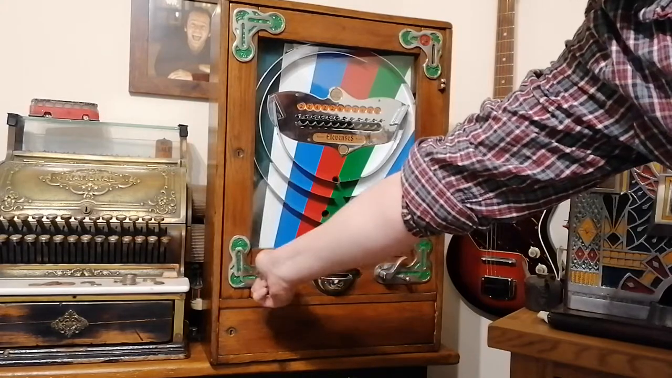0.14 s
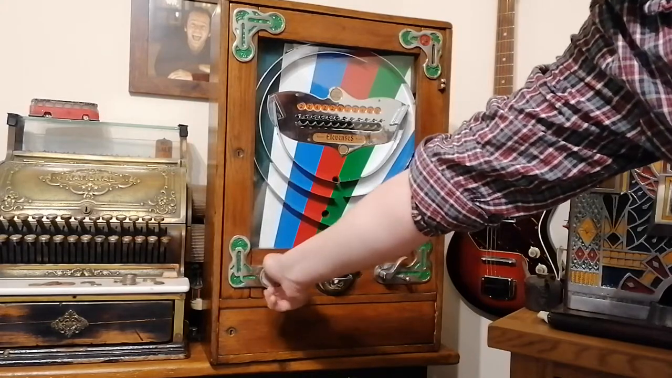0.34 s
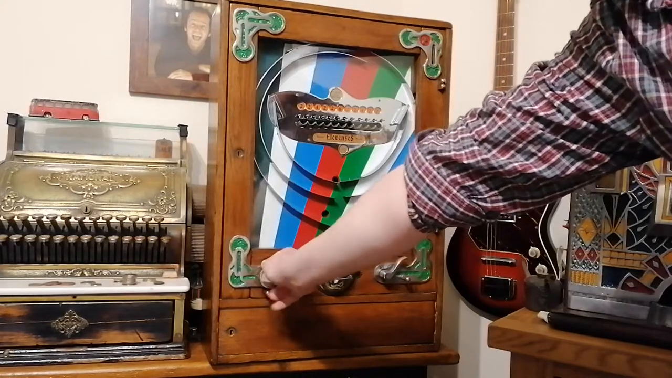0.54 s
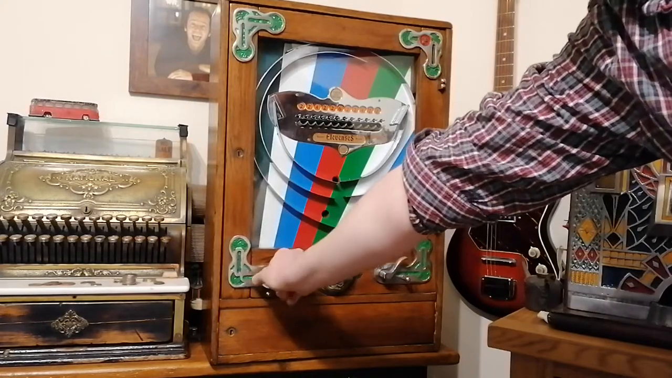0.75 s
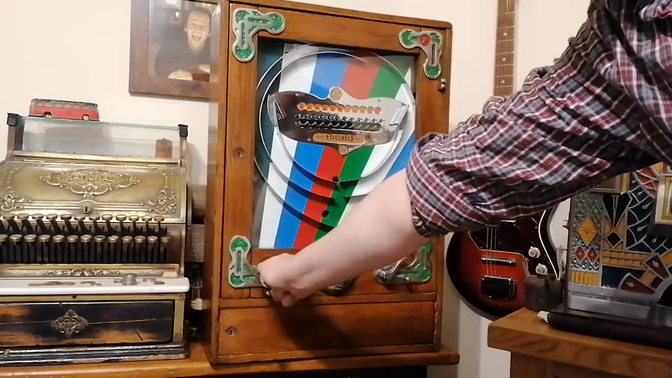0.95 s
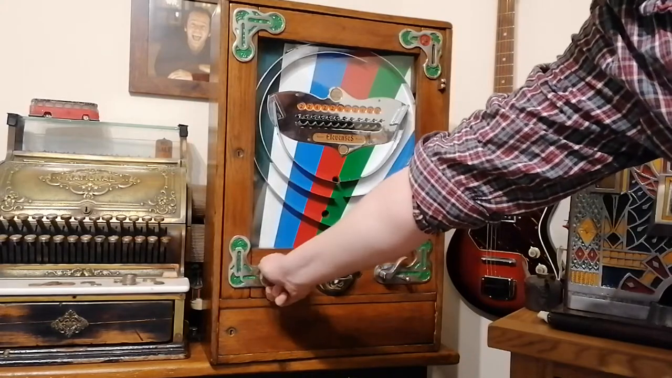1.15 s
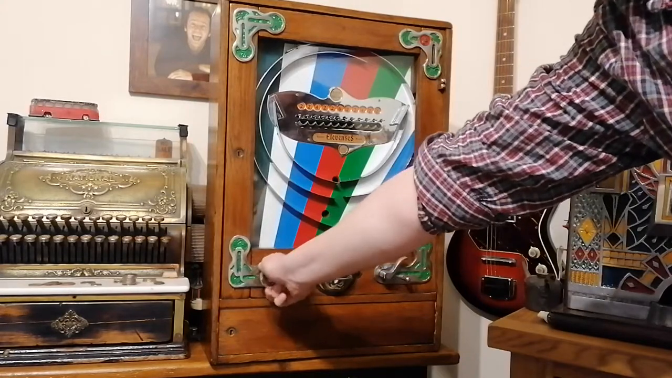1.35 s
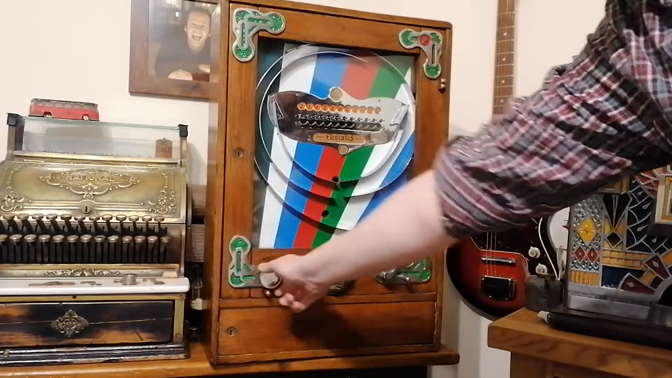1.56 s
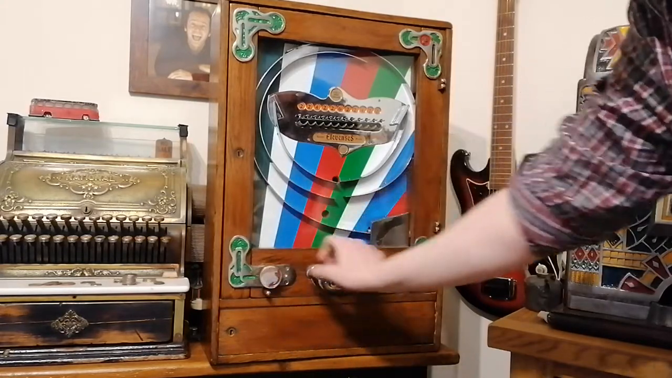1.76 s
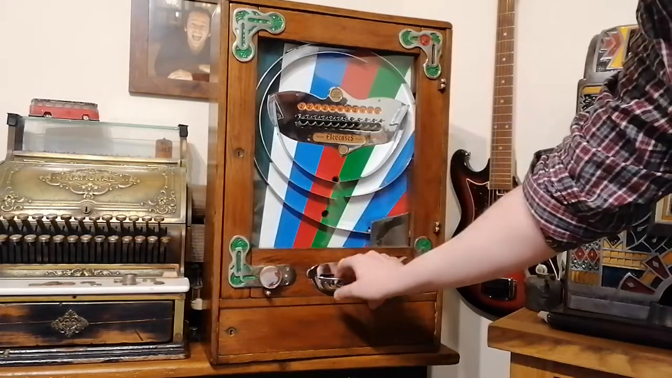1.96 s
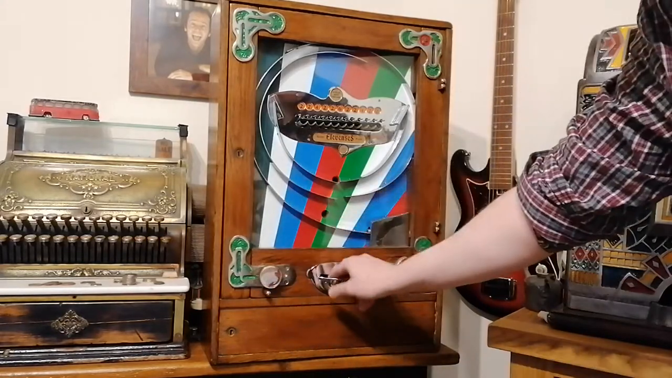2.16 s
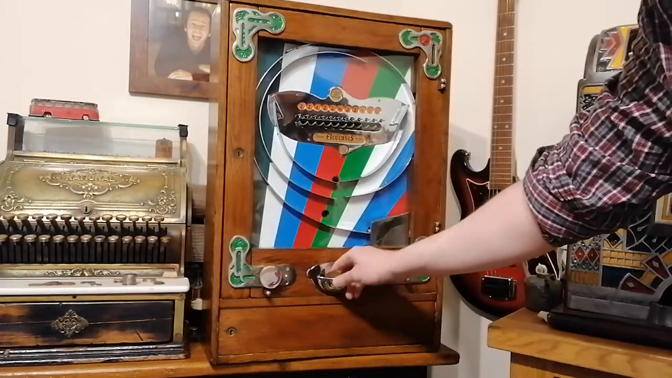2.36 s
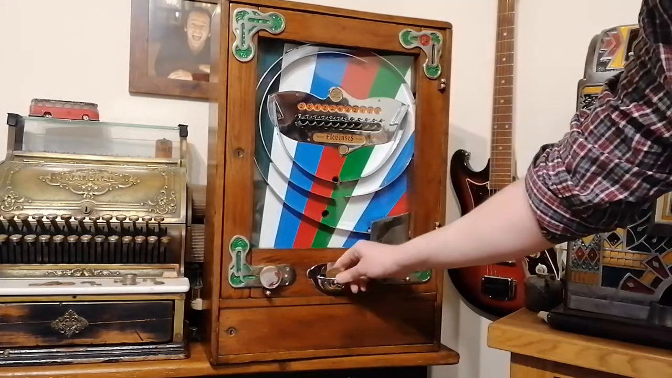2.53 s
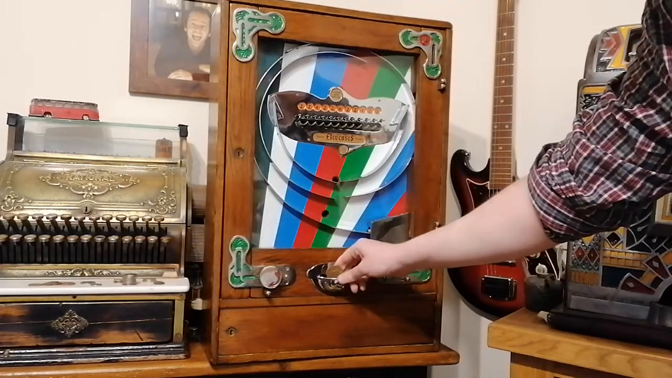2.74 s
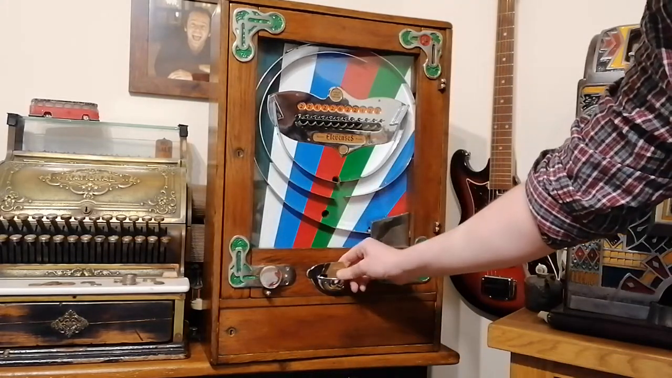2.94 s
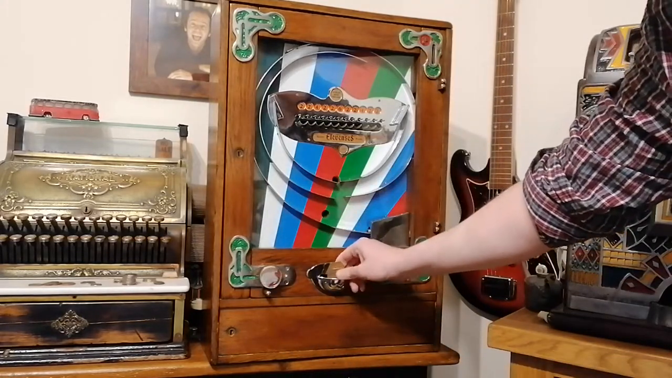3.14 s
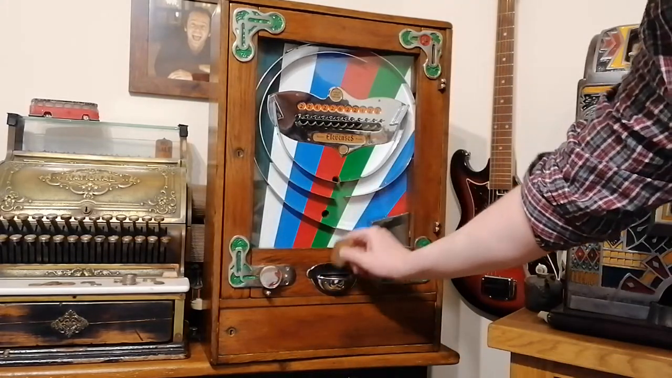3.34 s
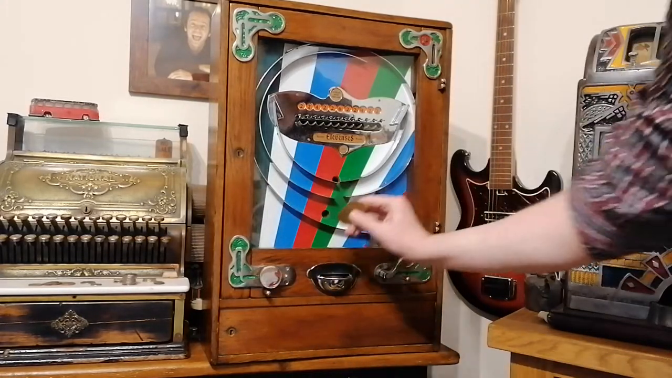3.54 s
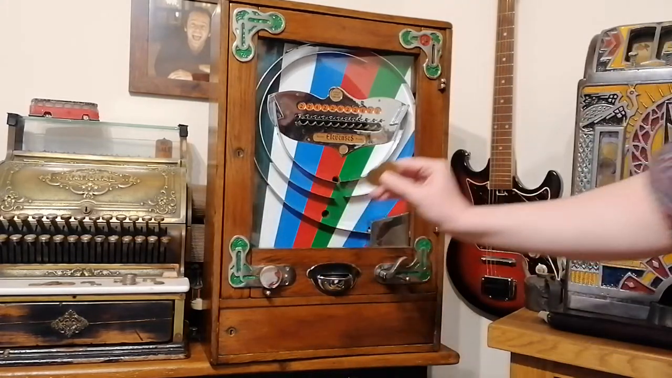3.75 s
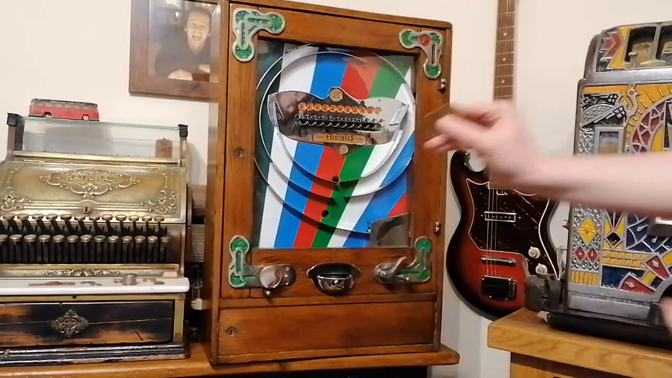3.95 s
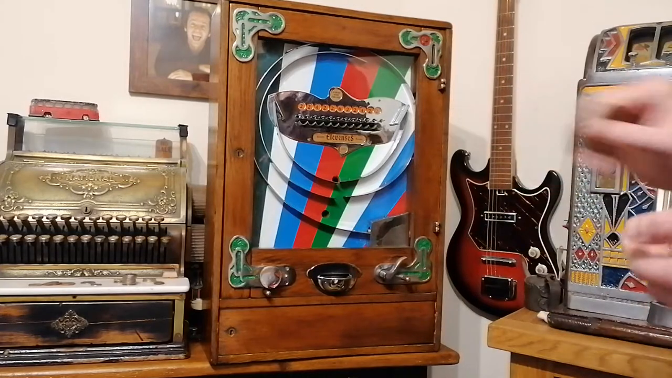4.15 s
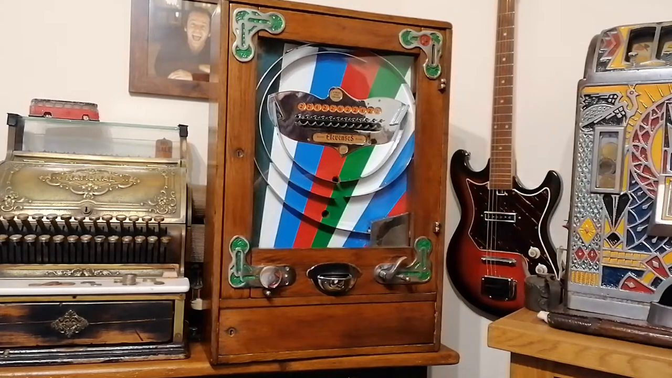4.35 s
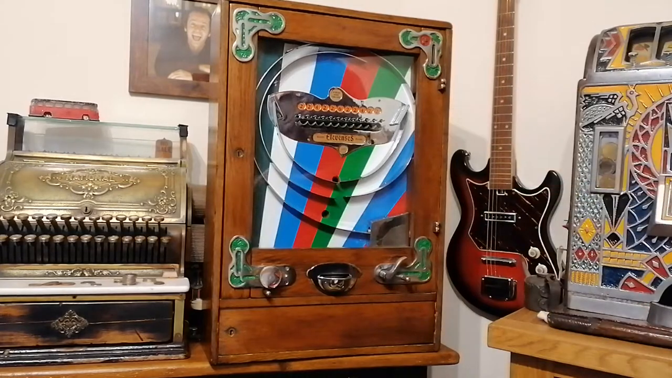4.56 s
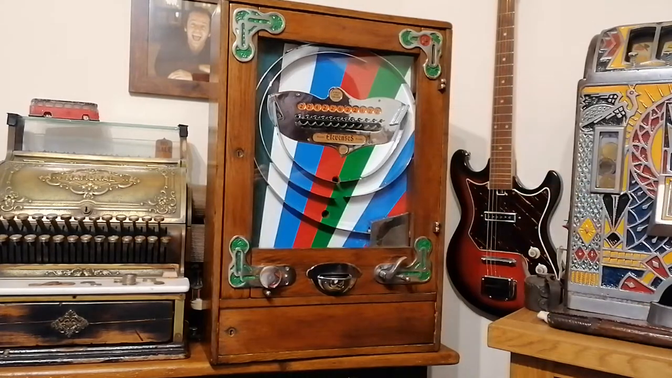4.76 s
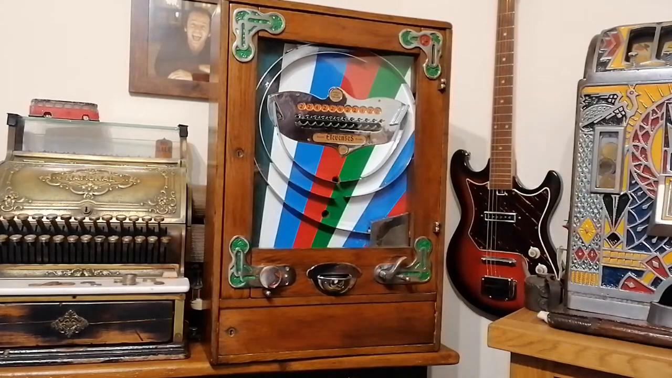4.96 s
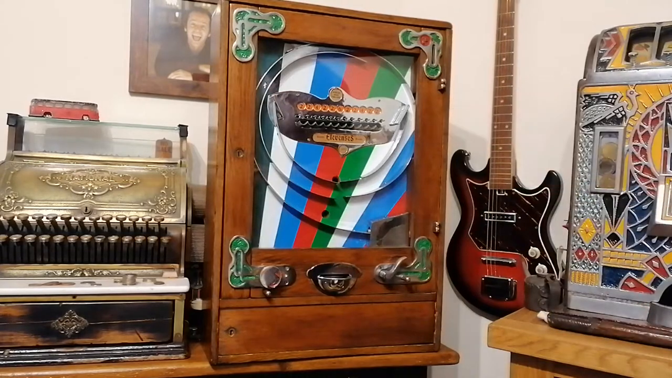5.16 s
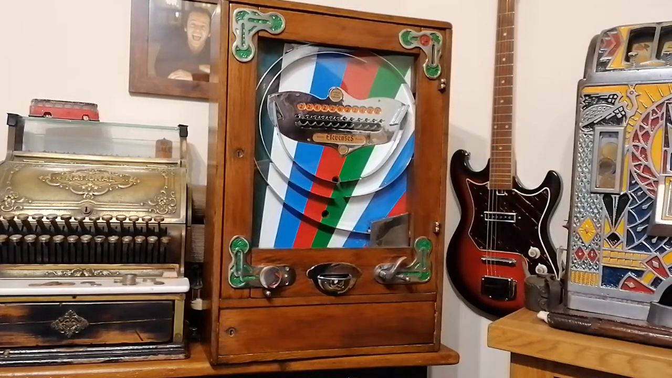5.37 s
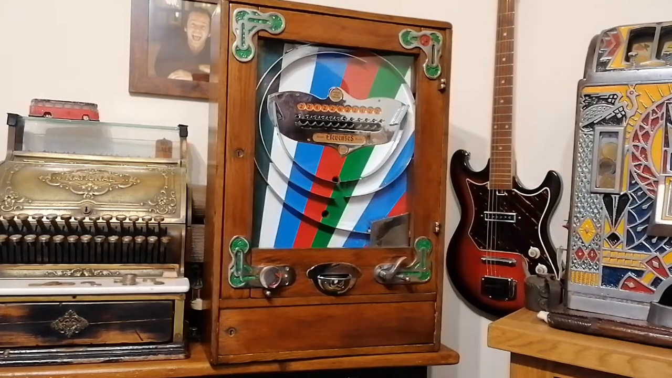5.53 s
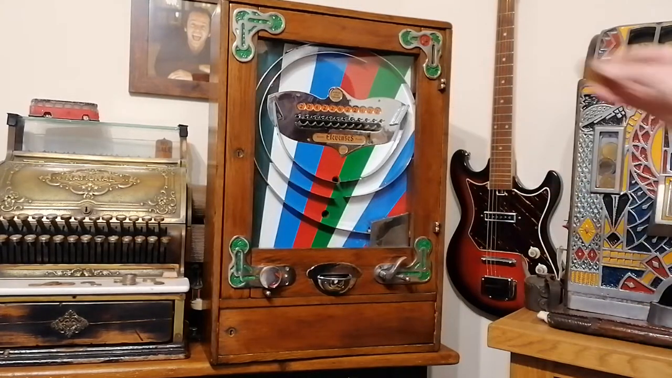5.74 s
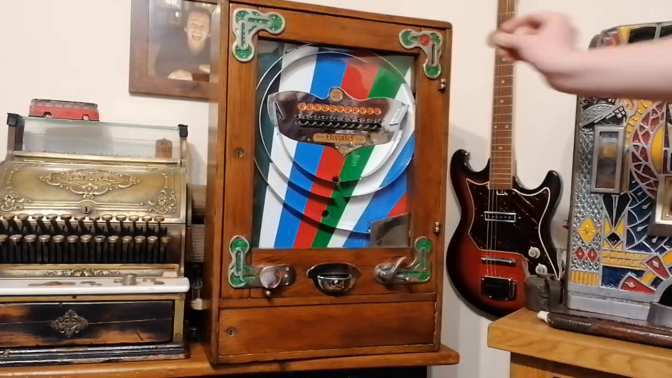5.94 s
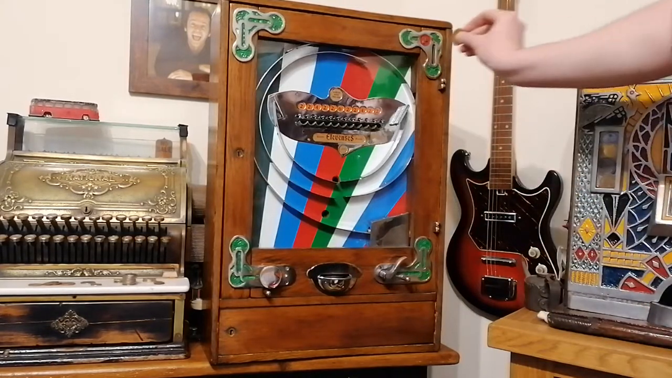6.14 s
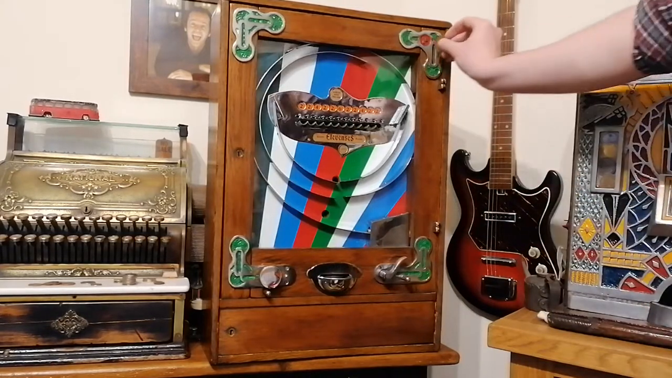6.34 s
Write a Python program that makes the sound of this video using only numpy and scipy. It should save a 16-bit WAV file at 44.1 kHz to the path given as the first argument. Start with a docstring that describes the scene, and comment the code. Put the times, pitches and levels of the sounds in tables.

```python
"""Old coin machine in a small room

A knob is turned: levers slam and chatter, tin parts shake, a coin rattles down and the wooden cabinet
booms. The knob springs back and the coin is fished out of the cup; then coins clink, ring and slide
in a hand. Each part sounds as damped modes struck by knocks or by streams of tiny contacts.
Short echoes of the furnished room surround it all, over steady room noise."""
import sys
import numpy as np
from scipy import signal
from scipy.fft import rfft, irfft
from scipy.io import wavfile

SR = 44100
rng = np.random.default_rng(int(sys.argv[2]) if len(sys.argv) > 2 else 0)


def output_pcm(signal):
    """Save a mono or channel-first signal as 16-bit PCM at the path in sys.argv[1].

    Samples are clipped to [-1, 1] before scaling.
    """
    pcm = np.clip(np.atleast_2d(signal).T, -1, 1) * 32767
    wavfile.write(sys.argv[1], SR, np.round(pcm).astype(np.int16))


N = 282240


def amp(db):
    """Gain of a dB value."""
    return 10 ** (np.asarray(db) / 20)


def rms_one(x):
    """Scale to rms 1."""
    return x / np.sqrt(np.mean(x ** 2) + 1e-20)


def at_hz(points, hz):
    """Interpolate (Hz, value) rows over log frequency."""
    points_hz, values = np.transpose(points)
    return np.interp(np.log(hz), np.log(points_hz), values)


def cut(x, kind, hz, order=2):
    """Butterworth high-, low- or band-pass."""
    return signal.sosfilt(signal.butter(order, hz, kind, fs=SR, output="sos"), x)


def place(x, pan_db, lag_samples):
    """Stereo pair: left is pan_db louder and lag_samples later."""
    n = np.arange(len(x))
    left = np.interp(n - lag_samples, n, x, left=0)
    return np.array([left, x]) * amp([[pan_db / 2], [-pan_db / 2]])


def contacts(per_s, spread_db):
    """Random touches of uneven size and sign; rms 1."""
    sizes = amp(spread_db * np.minimum(rng.exponential(1, N), 3)) * rng.choice([-1, 1], N)
    return rms_one(sizes * (rng.random(N) < per_s / SR))


def ring(clicks, hz, t60):
    """One mode: a unit click starts a decaying sine of height 1."""
    radius, angle = amp(-60 / (t60 * SR)), 2 * np.pi * hz / SR
    return signal.lfilter([0, np.sin(angle)], [1, -2 * radius * np.cos(angle), radius ** 2], clicks + 1e-18)


def body(touches, modes):
    """Each touch rings every mode (Hz, dB, t60 s) at a random strength; rms is about preserved."""
    out, power = 0, 0
    for hz, db, t60 in modes:
        gain = amp(db) / (t60 * SR)
        out += gain * ring(touches * rng.uniform(-0.89, 1, N), hz, t60)
        power += gain ** 2 * t60 * SR / (12 * np.log(1000))
    return out / np.sqrt(power)


def spells(starts, holds, t60s, levels_db, rise_s=0.0057):
    """Envelope of spells that swell, hold and fade."""
    t, out = np.arange(N) / SR, 0
    for start, hold, t60, db in zip(starts, holds, t60s, levels_db):
        fade_db = 60 * np.clip((t - start - hold) / t60, 0, 3)
        out += np.clip((t - start) / rise_s, 0, 1) * amp(db - fade_db)
    return out


def bursts(starts, levels_db, t60s, rise_s=0.0025):
    """Envelope of blows whose chatter dies away."""
    out = np.zeros(N)
    for start, db, t60 in zip(starts, levels_db, t60s):
        at = round(start * SR)
        t = np.arange(min(int(t60 * SR), N - at)) / SR
        out[at:at + len(t)] += amp(db - 60 * t / t60) * np.minimum(t / rise_s, 1)
    return out


def struck(rows, waver_share=0.6, waver_per_s=45):
    """One decaying tone per knock, shivering as the part wobbles on its support."""
    out, t = np.zeros(N + SR), np.arange(SR // 2) / SR
    for (start, db, hz, t60), draws in zip(rows, rng.standard_normal((len(rows), 2, 64))):
        swell, phase = [np.interp(t * waver_per_s, np.arange(64), draw) for draw in draws]
        envelope = amp(db - 60 * t / t60) * (1 + waver_share * swell)
        out[round(start * SR):][:len(t)] += envelope * np.sin(2 * np.pi * hz * t + phase)
    return out[:N]


# Rattling in the works. Each row: start, hold and fade t60 in seconds, lever level in dB,
# cabinet and tin levels in dB re levers.
RATTLES = [(-0.02, 0.24, 0.77, -47, -3.5, -3), (0.335, .35, 0.24, -46, -6.5, -1.5),
           (0.932, 0.098, 0.084, -58.5, -4.5, -0.5), (1.437, 0.3, 0.31, -86.5, 4.5, -13),
           (1.585, 0.086, 0.34, -62, -4, 3.5), (1.888, 0.28, 0.16, -80, 4, -9),
           (2.132, 0.061, 0.092, -60.5, -21, -4), (2.158, 0.16, 0.72, -60.5, 5.5, -3),
           (2.22, 0.031, 0.16, -48.5, -23, -6), (2.658, 0.035, 0.11, -83, 1.5, -9),
           (2.797, 0.21, 0.1, -87.5, 12, -8), (2.966, 0.38, 0.15, -80.5, 10.5, -2.5)]
# Lever slams. Each row: start in seconds, level in dB, cabinet in dB re level, chatter t60 in seconds.
SLAMS = [(0.035, -32.5, -10, 0.058), (0.085, -32, -9.5, 0.038), (0.137, -32.5, -14.5, 0.095),
         (0.158, -28, -28, 0.073), (0.179, -40, -19, 0.12), (0.321, -41.5, -6.5, 0.039),
         (0.34, -38.5, -22, 0.25), (0.387, -35, -4, 0.063), (0.429, -34, -6.5, 0.076),
         (0.475, -27.5, -38, 0.091), (0.489, -38, -32, 0.016), (0.519, -25.5, -13, 0.027),
         (0.538, -32, -21, 0.016), (0.6, -38, -41, 0.079), (0.676, -51, -15, 0.018),
         (0.869, -57.5, -5, 0.24), (0.92, -29.5, -18.5, 0.019), (0.964, -40.5, -9, 0.077),
         (0.988, -42, 6.5, 0.1), (1.036, -41.5, 14, 0.024), (1.069, -66, 7.5, 0.067),
         (1.443, -65, 5.5, 0.051), (1.56, -58, -2, 0.049), (1.595, -29.5, -5, 0.052),
         (1.613, -45.5, 15, 0.022), (1.896, -69, 4.5, 0.13), (2.172, -37, -22, 0.054),
         (2.247, -42, -21, 0.18), (2.366, -32, -17, 0.023), (2.389, -41.5, -13, 0.056),
         (2.671, -59, 4, 0.038), (2.965, -69.5, 14, 0.063), (3.038, -72.5, 13, 0.083),
         (3.11, -59.5, 1.5, 0.035), (3.258, -59.5, 4, 0.056)]


def works():
    """One stream of contacts, shaped by rattles and slams, drives levers, tin, frame and panels."""
    *timing, rattle_db, cabinet_db, tin_db = np.transpose(RATTLES)
    starts, slam_db, boom_db, t60s = np.transpose(SLAMS)
    last_rattle = np.searchsorted(timing[0], starts) - 1
    tin_lift_db = -1.6 + 0.1287 * (slam_db + 46) + tin_db[last_rattle]  # hard slams shake tin more
    on_levers = spells(*timing, rattle_db) + bursts(starts, slam_db, t60s)
    on_tin = spells(*timing, rattle_db + tin_db) + bursts(starts, slam_db + tin_lift_db, t60s)
    shaking = spells(*timing, rattle_db + cabinet_db)
    booms = bursts(starts, slam_db + boom_db, t60s)
    on_panels = amp(-12.5) * shaking + amp(-1) * booms
    return contacts(2000, spread_db=4.5) * np.array([on_levers, on_tin, shaking + booms, on_panels])


# Lever modes. Each row: frequency in Hz, nominal bandwidth in Hz, level in dB.
LEVER_MODES = [(1204, 210, -0.5), (1378, 9.3, -0.5), (1711, 43, 2), (2090, 290, -1.5), (2417, 85, -3),
               (2720, 180, -2.5), (2972, 83, -1), (3247, 140, -1.5), (3840, 33, -3.5), (4490, 18, -6)]


def levers(drive):
    """Levers chatter; broader modes die sooner."""
    return body(drive, [(hz, db, np.log(1000) / (np.pi * width * 1.5)) for hz, width, db in LEVER_MODES])


# Thin sheet spectrum. Each row: frequency in Hz, level in dB.
TIN_SPECTRUM = [(1760, -29), (3000, 10), (3540, -8.5), (4470, -7), (6170, -8), (6750, -4.5), (8470, -13),
                (9900, -13.5), (11200, -29.5), (15500, -54)]


def tin(drive, t60_cycles=50):
    """Thin sheet parts shake in many short treble modes."""
    pitches = np.geomspace(3500, 15000, 20)
    return body(drive, [(hz, at_hz(TIN_SPECTRUM, hz), t60_cycles / hz) for hz in pitches])


# Frame and cup modes. Each row: frequency in Hz, level in dB, t60 in seconds.
FRAME_MODES = [(338, -2, 0.1), (390, -4, 0.054), (450.6, 0.5, 0.1), (505.5, 1.5, 0.072), (551, 5.5, 0.043),
               (613, 0.5, 0.12), (663, -3, 0.026), (722, -3, 0.018), (852, -1.5, 0.06), (390, -1.5, 0.061),
               (1040, -2, 0.034)]


def frame(drive):
    """The cabinet frame and coin cup knock dully."""
    return body(drive, FRAME_MODES)


# Cabinet panel modes. Each row: frequency in Hz, level in dB, nominal t60 in seconds.
PANEL_MODES = [(148, -6, 0.1), (165, -11.5, 0.6), (171.2, -3, 0.065), (190.8, -3, 0.18), (187.6, -6, 0.85),
               (210, -7, 0.26), (241, -9.5, 0.21), (260.5, -6.5, 0.5), (273.3, -12, .3), (298, -6.5, 0.27),
               (396.3, -4, 0.085), (456, -1, 0.075), (567, 0, 0.038), (673.5, -2.5, 0.14)]


def panels(drive, t60_share=0.35):
    """The ten lowest panel modes boom, damped by the hand resting on the knob."""
    return body(drive, [(hz, db, t60_share * t60) for hz, db, t60 in PANEL_MODES[:10]])


# Free coin modes. Each row: frequency in Hz, level in dB, t60 in seconds.
COIN_MODES = [(5720, -7, 0.04), (10000, 0, 0.06), (10170, -4, 0.03), (12960, -9, 0.08), (12520, -16, 0.02),
              (7420, -14, 0.015), (6800, -14, 0.025)]
# Spells of rolling. Each row: start, hold and fade t60 in seconds, level in dB.
ROLLS = [(0.026, 0.02, 0.2, -37), (0.184, 0.035, 0.066, -43.5), (0.34, 0.14, 0.15, -47),
         (0.524, 0.075, 0.28, -35.5), (0.657, 0.006, 0.17, -33.5), (0.913, 0.042, 0.15, -69)]


def rolling_coin():
    """The coin rings freely from many small contacts on its way down."""
    return body(contacts(780, spread_db=4) * spells(*np.transpose(ROLLS)), COIN_MODES)


# Knocks on single parts. Each row: start in seconds, level in dB, pitch in Hz, t60 in seconds.
PINGS = [(.086, -29, 1702, 0.052), (.14, -24.5, 996, 0.037), (.16, -29.5, 1720, .05),
         (.162, -35, 1354, 0.033), (.16, -29, 2345, 0.086), (.278, -39.5, 1700, 0.056),
         (.32, -38.5, 1730, 0.1), (.345, -30.5, 1720, 0.068), (0.391, -29, 1696, 0.052),
         (.435, -39, 1680, .07), (.473, -33, 3130, 0.071), (.48, -40.5, 1670, 0.047),
         (.52, -27, 2056, 0.037), (.522, -35, 2960, 0.032), (.57, -33.5, 1998, 0.054),
         (.6, -44.5, 2140, 0.051), (0.642, -38.5, 2060, 0.098), (.675, -37.5, 2080, 0.075),
         (.72, -45, 1990, 0.087), (1.465, -67, 1558, 0.23), (1.56, -54, 1490, 0.082),
         (1.9, -65.5, 2070, 0.4), (1.9, -60, 2156, 0.3), (2.106, -71, 3160, 0.18),
         (2.245, -35, 2590, 0.065), (3.184, -68, 1965, 0.13)]


def pings():
    """Knocked parts of the works ring out at their own pitches."""
    return struck(PINGS)


# Thuds on the cabinet. Each row: start in seconds, level in dB, factor on the panel t60.
THUDS = [(.152, -49, .6), (0.396, -47, 0.47), (.52, -55.5, 0.51), (0.901, -57, 0.31), (0.993, -69, 0.19),
         (1.037, -45.5, 1.33), (1.042, -37.5, 0.26), (1.6, -47.5, 2.03), (2.249, -61, 0.25),
         (2.39, -58, 0.53)]


def thuds(rise_s=0.004, scatter_db=0.96):
    """Each soft push rings every panel mode."""
    out, t = np.zeros(N), np.arange(SR) / SR
    for start, db, t60_factor in THUDS:
        ringing = 0
        for hz, mode_db, t60 in PANEL_MODES:
            envelope = amp(mode_db + rng.normal(0, scatter_db) - 60 * t / (t60_factor * t60))
            ringing += envelope * np.sin(2 * np.pi * hz * t)
        out[round(start * SR):][:len(t)] += amp(db) * ringing * np.minimum(t / rise_s, 1)
    return out


def machine():
    """Wood and metal signals; small parts radiate no bass, the cabinet little below its first mode."""
    to_levers, to_tin, to_frame, to_panels = works()
    clatter, sizzle = levers(to_levers), tin(to_tin)
    wood = frame(to_frame) + panels(to_panels)
    sizzle += rolling_coin()
    clatter += pings()
    wood = cut(wood + thuds(), "high", 130, order=4)
    return cut(wood, "low", 1200), cut(clatter, "high", 560) + cut(sizzle, "high", 2100)


# Spectrum of coins damped by fingers. Each row: frequency in Hz, level in dB.
HELD_SPECTRUM = [(880, -67), (1500, -33), (2700, -6.5), (4180, -2.5), (5500, -4.5), (7500, -4),
                 (10200, -8.5), (12000, -21.5), (15500, -24.5)]
HELD_MODES_HZ = np.geomspace(1400, 15000, 36)


def held_coin(hz, db, draws, scatter_db=1.5, own_lift_db=7, t60_cycles=12):
    """Impulse response of a held coin: modes near its pitch and one partner ring louder and longer."""
    pitches, t = HELD_MODES_HZ, np.arange(512) / SR
    ratio = 1.65 if hz < 8000 else 1 / 1.65
    main, partner = [np.exp(-(np.log(pitches / centre) / 0.13) ** 2) for centre in (hz, hz * ratio)]
    own = main + 0.39 * partner
    tilt_db_per_octave = -1 + 0.1 * (db + 31.5)  # harder clinks are brighter
    modes_db = at_hz(HELD_SPECTRUM, pitches) + scatter_db * draws[:, 0] + own_lift_db * own
    gains = amp(modes_db + tilt_db_per_octave * np.log2(pitches / 6000)) * (-1) ** np.arange(len(pitches))
    delay_s = 0.0005 * np.log2(pitches[-1] / pitches)  # slow bending waves: low modes speak later
    detuned_hz = pitches * (1 + 0.0077 * draws[:, 1])
    cycles = detuned_hz[:, None] * np.maximum(t - delay_s[:, None], 0)
    decay = amp(-60 * cycles / (t60_cycles * (1 + 0.8 * own[:, None])))
    return gains @ (np.sin(2 * np.pi * cycles) * decay)


# Coins touching in the hand. Each row: start in seconds, level in dB, pitch in Hz, left over right in dB.
CLINKS = [(3.597, -35.5, 9600, -8.5), (3.645, -45, 9000, -3), (3.649, -39, 5450, -2),
          (3.6535, -31, 9330, -18.5), (3.6556, -40, 5460, -1), (3.6637, -27.5, 5470, 6),
          (3.788, -39.5, 7700, 2), (4.064, -60.5, 2930, 2), (4.148, -56, 9350, 3.5),
          (4.4766, -30, 5840, -1.5), (4.5633, -30.5, 9540, 0), (4.567, -25.5, 10060, 5),
          (4.606, -27.5, 7930, -7), (4.641, -39, 8060, -15), (4.663, -29, 7400, 4), (4.706, -34, 9500, 2),
          (4.715, -42, 9900, 6), (4.7616, -31, 7000, -17), (4.7629, -23, 9700, 8), (4.767, -25, 7040, 8),
          (4.7719, -24, 9730, -9.5), (4.775, -26, 10100, 4), (4.9112, -47.5, 4770, 3),
          (4.936, -27, 5230, 4), (4.969, -32, 9700, 8), (5.0086, -48, 2740, -14), (5.119, -25.5, 5100, 1),
          (5.123, -28, 5600, 2), (5.1277, -31, 5600, 16), (5.131, -41, 4900, 6), (5.197, -31, 9500, 7),
          (5.3453, -58.5, 2490, -9), (5.3673, -33.5, 5940, -8), (5.408, -46, 10400, 2),
          (5.428, -54, 9000, 0), (5.4372, -37.5, 7300, 7.5), (5.508, -41, 8200, -13),
          (5.5185, -22, 9100, 5), (5.5207, -25, 6740, 16), (5.6678, -69, 4150, -13), (5.675, -47, 4080, -5),
          (5.7572, -29, 9900, 1), (5.795, -32, 9700, 3.5), (5.842, -45.5, 9300, 5),
          (5.8626, -46, 9400, -7.5), (5.999, -52, 5380, 8), (6.0443, -57, 3560, 4),
          (6.0819, -51.5, 5900, -2), (6.118, -48.5, 5160, 1.5), (6.1743, -35.5, 10200, 5),
          (6.3356, -58, 6550, 1.5), (6.3887, -58, 7700, 3)]


def clinks(chatter_share=0.1, chatter_t60_s=0.006):
    """Each clink is one hit and a brief chatter into a held coin's modes."""
    out, t = np.zeros((2, N + 4096)), np.arange(1024) / SR
    scatter = rng.standard_normal((len(CLINKS), len(HELD_MODES_HZ), 2))
    touches = contacts(9000, spread_db=2)
    for (start, db, hz, pan_db), draws in zip(CLINKS, scatter):
        at = round(start * SR)
        chatter = chatter_share * touches[at:at + len(t)] * amp(-60 * t[:N - at] / chatter_t60_s)
        chatter[0] = 1  # the first hit
        clink = np.convolve(chatter, held_coin(hz, db, draws))
        clink *= amp(db) / np.abs(clink).max()
        out[:, at:at + len(clink)] += place(clink, pan_db, lag_samples=17.73)
    return out[:, :N]


# Rings of loose coins. Each row: start in seconds, level in dB, pitch in Hz, t60 in seconds.
LOOSE_RINGS = [(3.654, -40, 12500, .04), (3.654, -48.5, 5480, 0.15), (3.654, -40.5, 9540, 0.057),
               (4.607, -45, 7600, .08), (4.69, -57, 10000, 0.052), (4.71, -45.5, 9950, 0.023),
               (4.937, -38, 5700, 0.12), (4.937, -54, 12500, 0.091), (4.937, -41.5, 10200, 0.049),
               (5.117, -36.5, 5670, 0.057), (5.117, -48, 12930, 0.17), (5.117, -50, 12500, 0.14),
               (5.117, -43, 10300, 0.086), (5.197, -46, 10050, 0.097), (5.197, -54, 5670, 0.27),
               (5.366, -49, 5750, 0.067), (5.366, -57, 13200, 0.082), (5.366, -51, 10200, 0.063),
               (5.438, -53, 7580, 0.1), (5.52, -36, 7000, 0.075), (5.758, -49, 9800, 0.07),
               (5.758, -59.5, 13000, .08), (5.84, -49.5, 9260, 0.057), (6.175, -50, 10280, 0.081),
               (6.175, -76, 12960, 0.084)]


def loose_coins():
    """A coin left loose in the hand rings on."""
    return struck(LOOSE_RINGS)


# Spells of sliding. Each row: start, hold and fade t60 in seconds, level in dB.
SLIDES = [(4.536, 0.31, .33, -63.5), (4.927, 0.07, 0.24, -60), (5.126, .07, 0.59, -67),
          (5.357, 0.049, 0.27, -60.5), (5.63, 0.89, .3, -79.5)]


def sliding_coins(t60_cycles=15):
    """Coins slide on each other: dense contacts excite their damped modes."""
    modes = [(hz, at_hz(HELD_SPECTRUM, hz), t60_cycles / hz) for hz in HELD_MODES_HZ]
    return body(contacts(3100, spread_db=8) * spells(*np.transpose(SLIDES)), modes)


def hand():
    """Coins in the hand, in stereo; they are too small to radiate bass."""
    coins = clinks() + place(sliding_coins() + loose_coins(), pan_db=-0.2, lag_samples=16.7)
    return cut(coins, "high", 1500, order=4)


def stereo(mid, side, likeness):
    """Mix two independent noises to a pair with the given left-right correlation."""
    return np.sqrt(1 + likeness) * mid + np.sqrt(1 - likeness) * side * [[1], [-1]]


# Room decay. Each row: frequency in Hz, t60 in seconds.
ROOM_T60 = [(150, 0.3), (500, 0.34), (2000, 0.25), (6000, 0.22), (14000, 0.061)]


def room(x, gap_s, alike_hz):
    """Diffuse echoes: each octave dies at its own rate; long waves reach both ears alike."""
    t, echoes = np.arange(SR // 2) / SR, 0
    for low_hz in 88 * 2. ** np.arange(8):
        band = cut(rng.standard_normal((2, len(t))), "band", [low_hz, min(2 * low_hz, 19000)])
        mid, side = band * amp(-60 * t / at_hz(ROOM_T60, np.sqrt(2) * low_hz))
        echoes += stereo(mid, side, likeness=1 / (1 + (low_hz / alike_hz) ** 2))
    echoes *= np.clip((t - gap_s) / gap_s, 0, 1)  # the first wall answers after the gap
    echoes /= np.sqrt(np.sum(echoes ** 2) / 2)
    return signal.fftconvolve(x[None], echoes)[:, :N]


def shifting_room(x, gap_s, alike_hz, shifts_per_s=2.5):
    """Sound leaves from changing spots: it crossfades among three sets of echoes."""
    angle = np.pi * shifts_per_s * np.arange(N) / SR
    fades = [np.sqrt(2 / 3) * np.cos(angle + k * np.pi / 3) for k in range(3)]
    return sum(room(x * fade, gap_s, alike_hz) for fade in fades)


# Room noise spectrum. Each row: frequency in Hz, relative density in dB.
NOISE_SPECTRUM = [(12, -22), (20, -2), (93, -5.5), (127, -7), (177, -12), (472, -16.5), (527, -16.5),
                  (1370, -21), (1480, -20.5), (2080, -21.5), (2260, -22.5), (6540, -29), (16000, -51.5)]
# Room noise likeness. Each row: frequency in Hz, left-right correlation.
NOISE_LIKENESS = [(60, -0.012), (240, 0.1), (950, -0.074), (3770, 0.0823), (15000, 0.042)]


def room_noise(level_db=-69):
    """Steady room and microphone noise, nearly independent left and right."""
    hz = np.maximum(np.fft.rfftfreq(N, 1 / SR), 1)
    mid, side = rfft(rng.standard_normal((2, N))) * amp(at_hz(NOISE_SPECTRUM, hz))
    likeness = np.clip(at_hz(NOISE_LIKENESS, hz), 0, 1)
    return amp(level_db) * rms_one(irfft(stereo(mid, side, likeness), N))


def scene():
    """The machine, slightly left, and the hand, to the right, share the room."""
    wood, metal = machine()
    coins = hand()
    boom = wood + amp(-4.5) * shifting_room(wood, gap_s=0.0032, alike_hz=400)
    boom *= amp([[1], [-1]])
    echoes = shifting_room(amp(-0.5) * metal + amp(-3) * coins[1], gap_s=0.0021, alike_hz=447)
    sound = boom + place(amp(-2) * metal, pan_db=1.8, lag_samples=0.92) + coins + echoes
    left_treble = cut(sound[0], "band", [7500, 15000], order=1)
    sound[0] -= (1 - amp(-2)) * left_treble  # its housing shades the left microphone
    return sound + room_noise()


def record(dry):
    """Steep low-pass, 70 dB down from 16.4 kHz."""
    return signal.sosfilt(signal.cheby2(12, 70, 16400, fs=SR, output="sos"), dry)


dry = scene()
out = record(dry)
output_pcm(out)
```